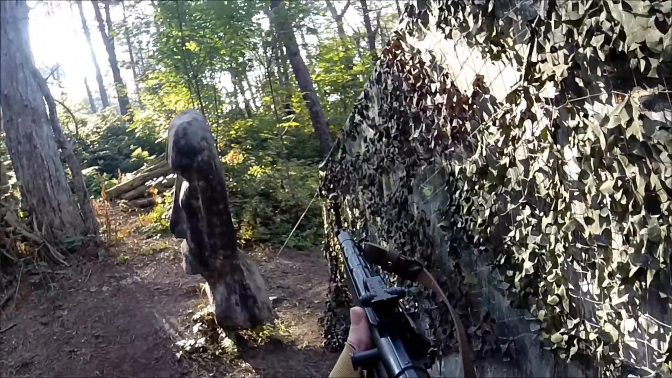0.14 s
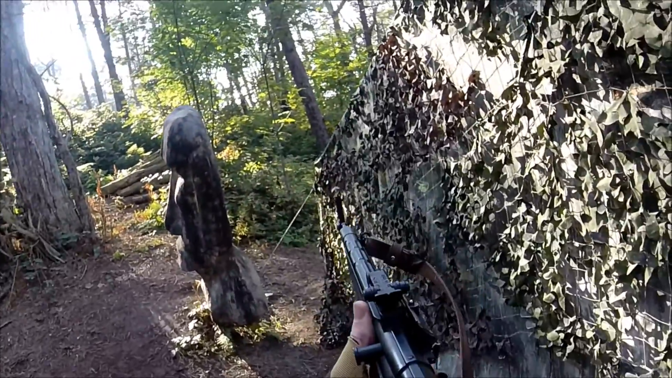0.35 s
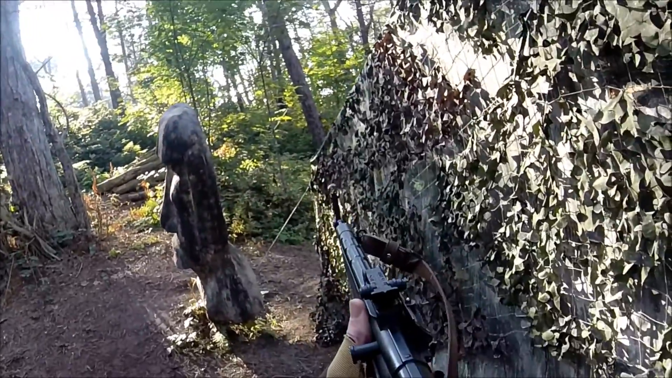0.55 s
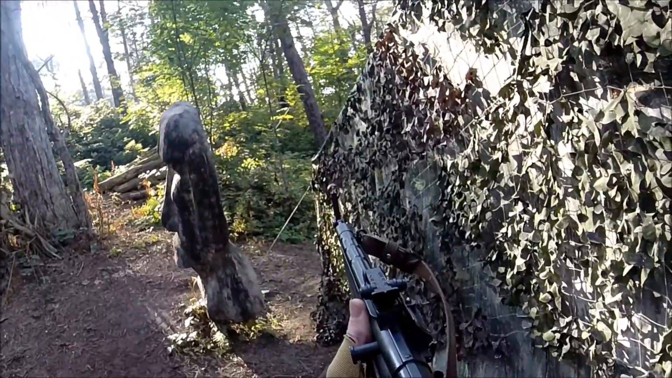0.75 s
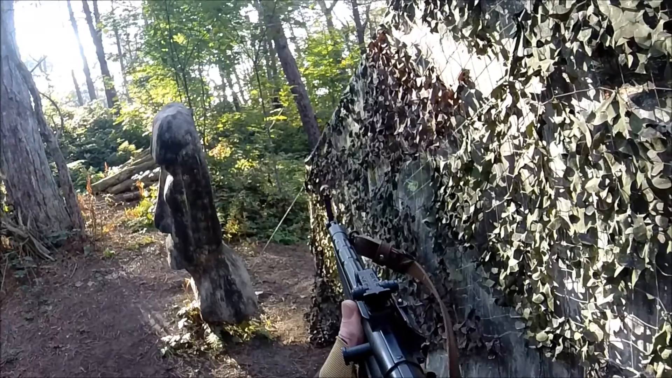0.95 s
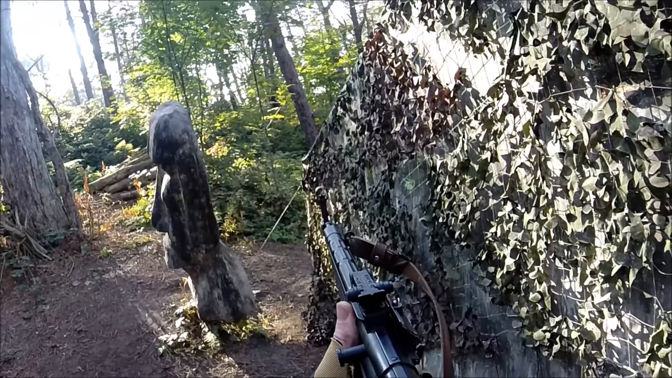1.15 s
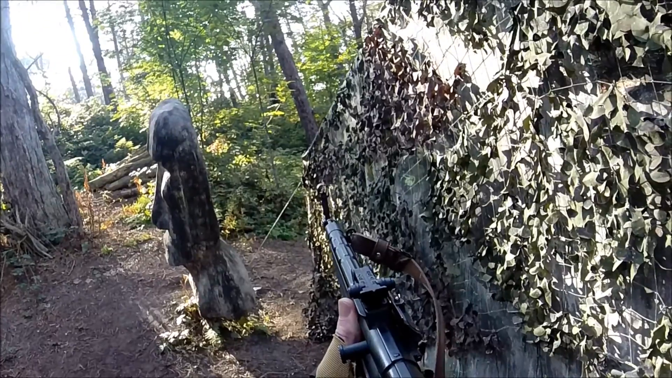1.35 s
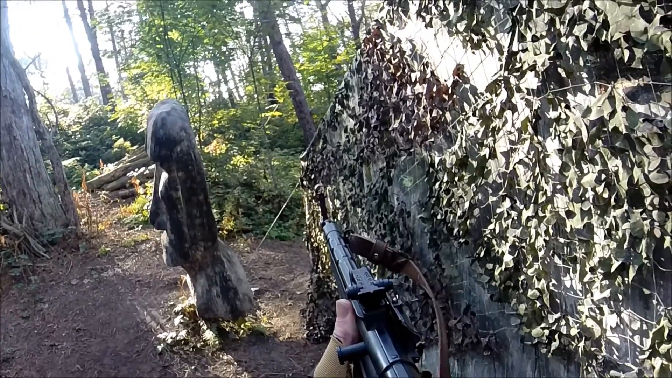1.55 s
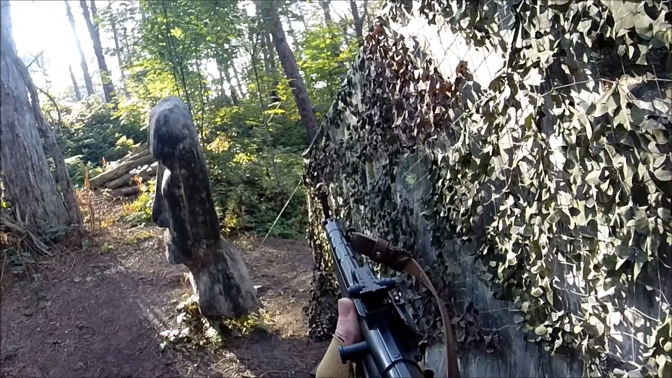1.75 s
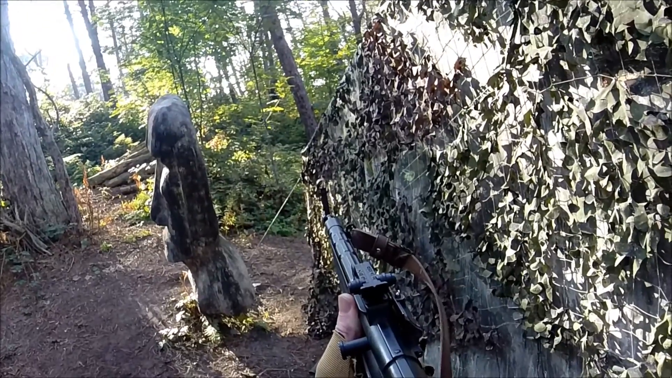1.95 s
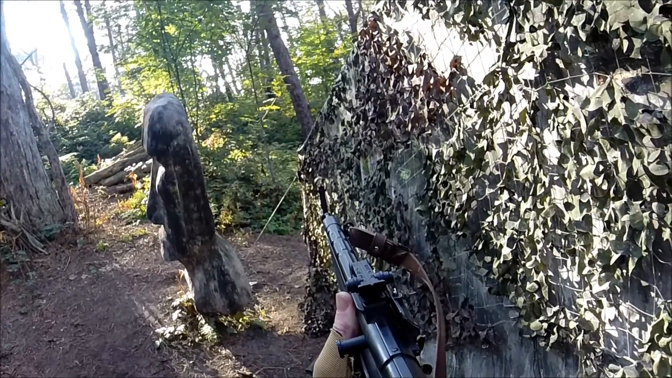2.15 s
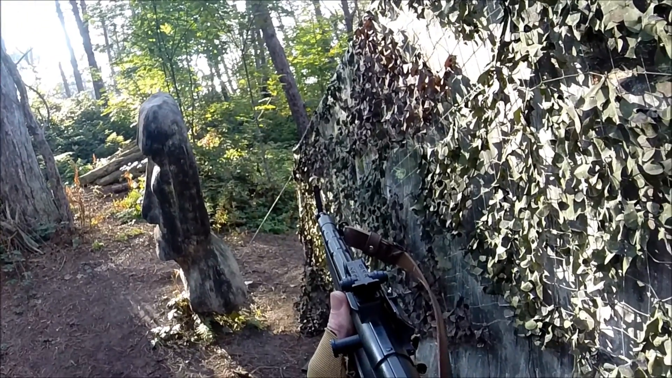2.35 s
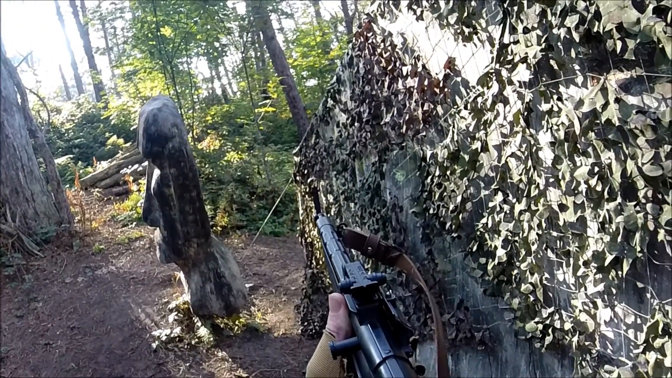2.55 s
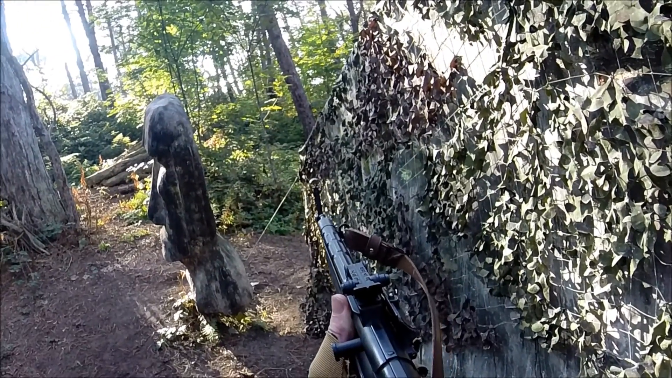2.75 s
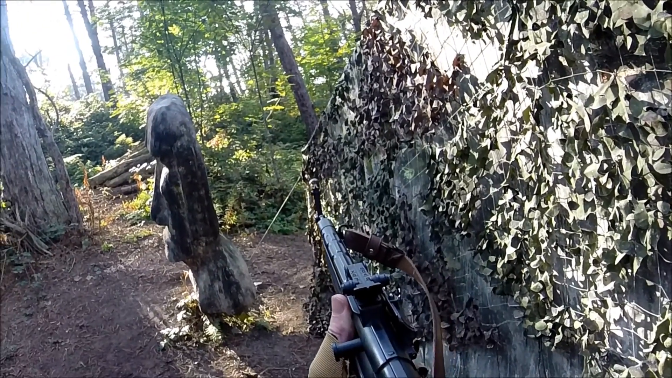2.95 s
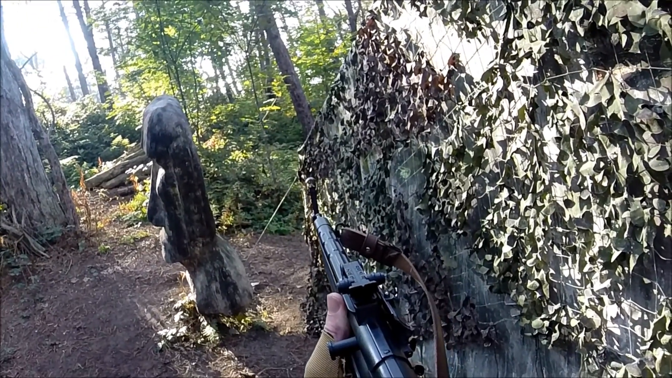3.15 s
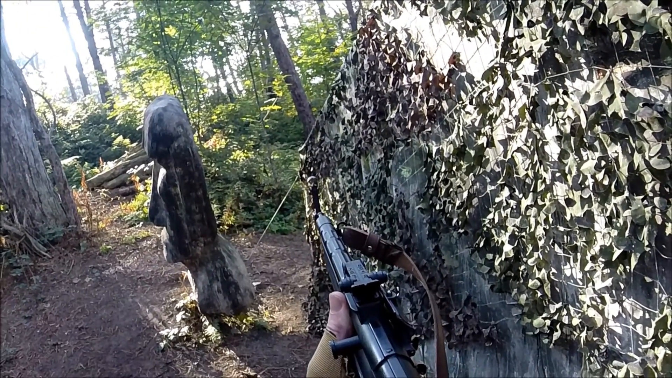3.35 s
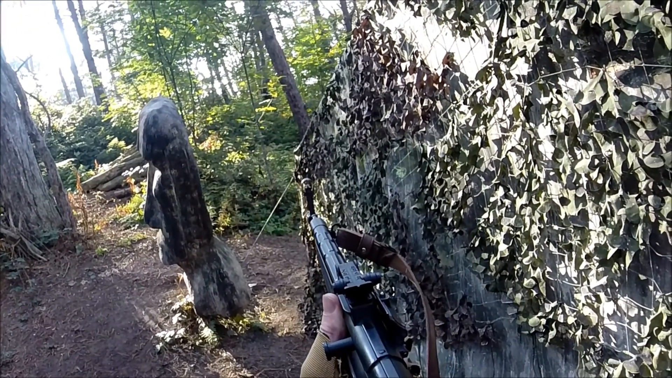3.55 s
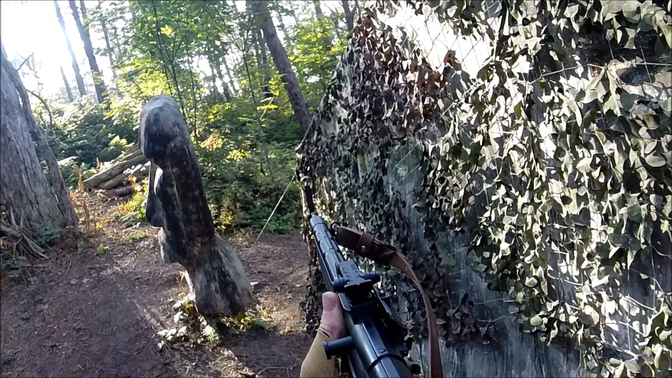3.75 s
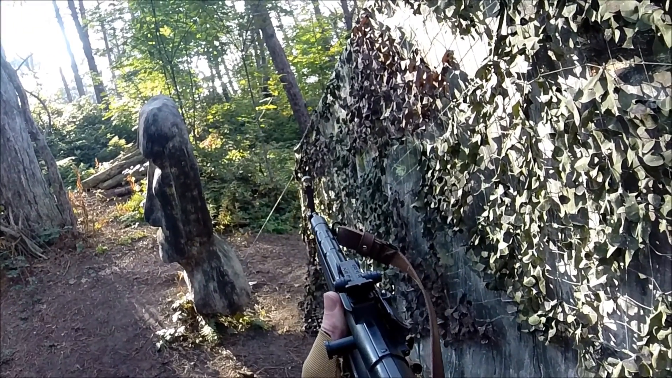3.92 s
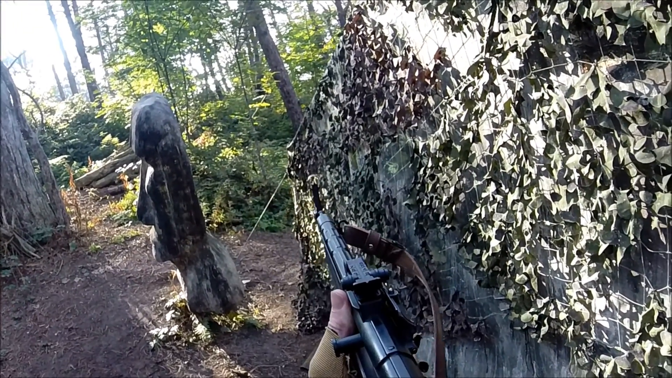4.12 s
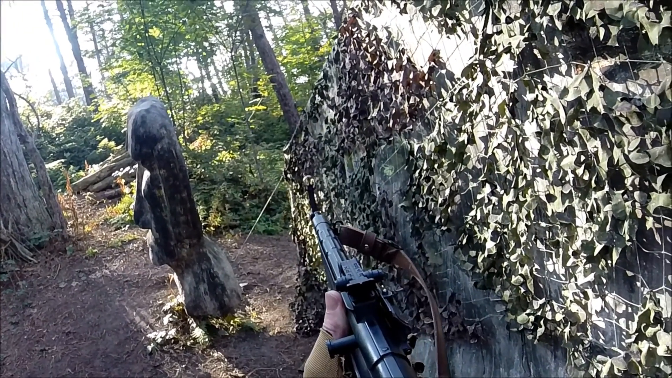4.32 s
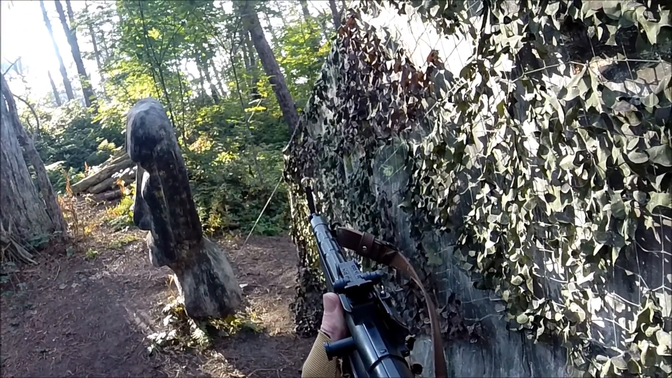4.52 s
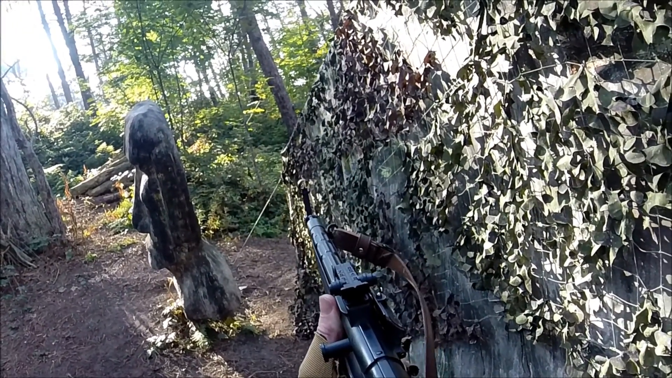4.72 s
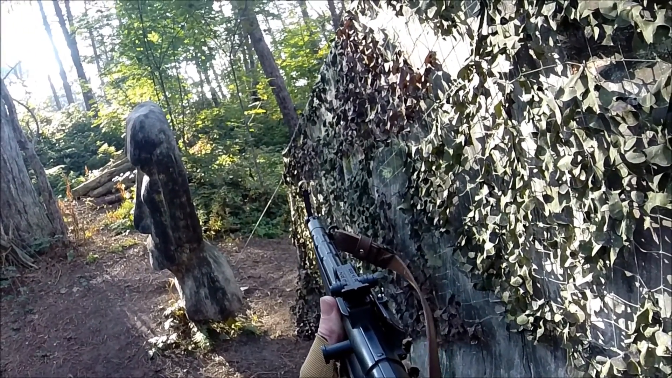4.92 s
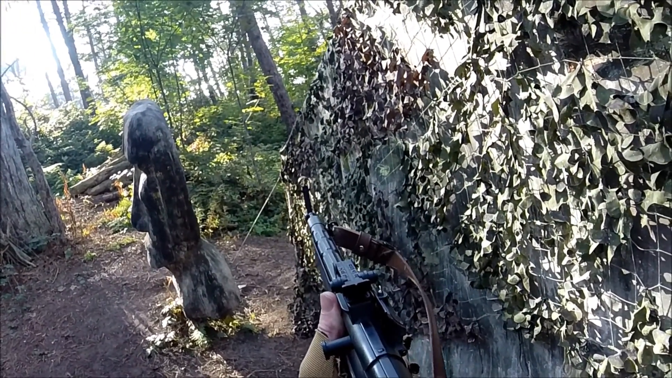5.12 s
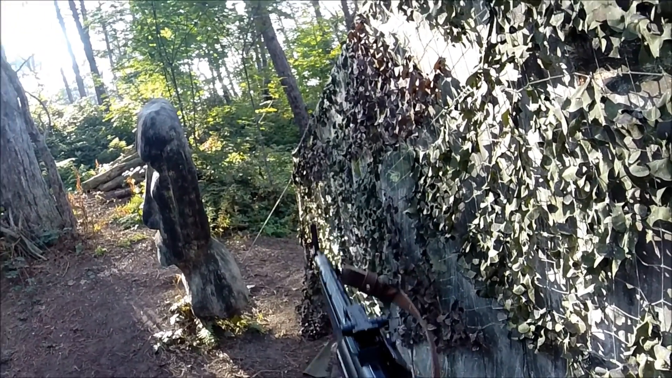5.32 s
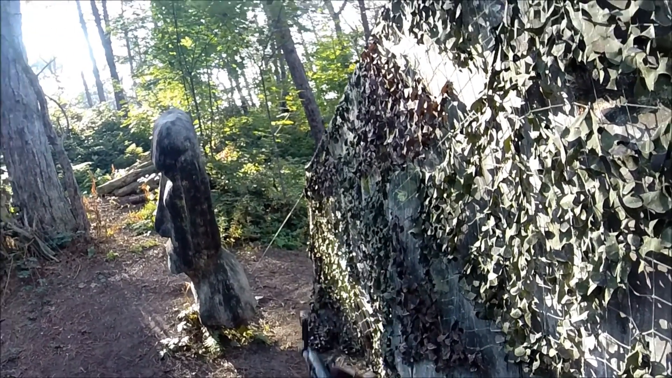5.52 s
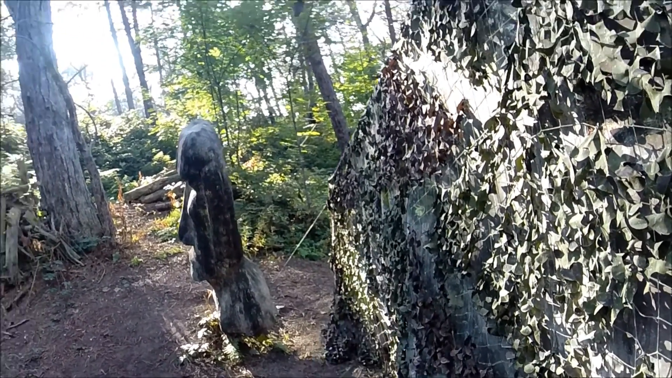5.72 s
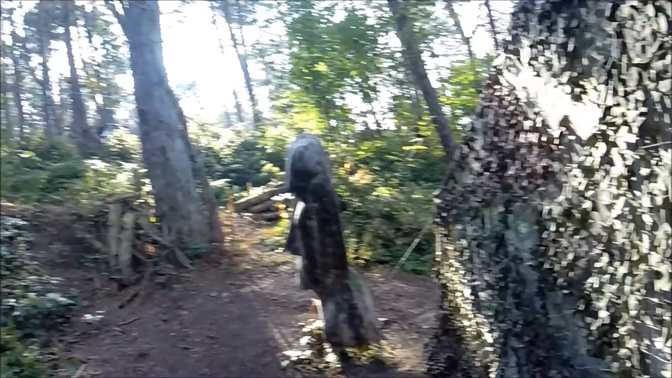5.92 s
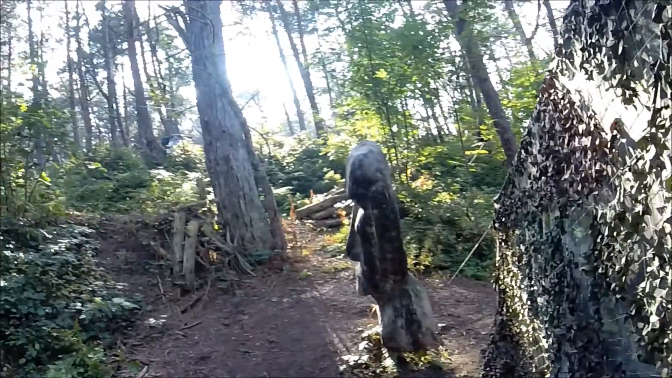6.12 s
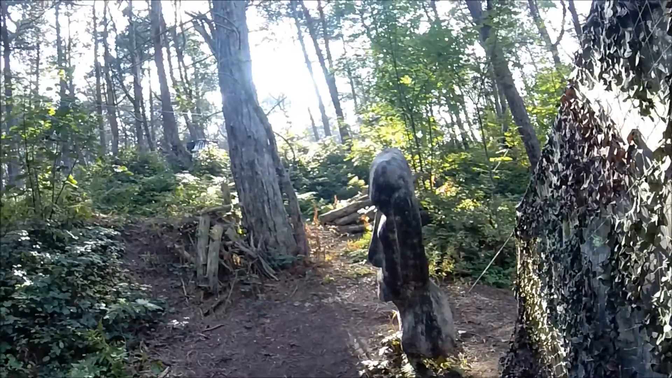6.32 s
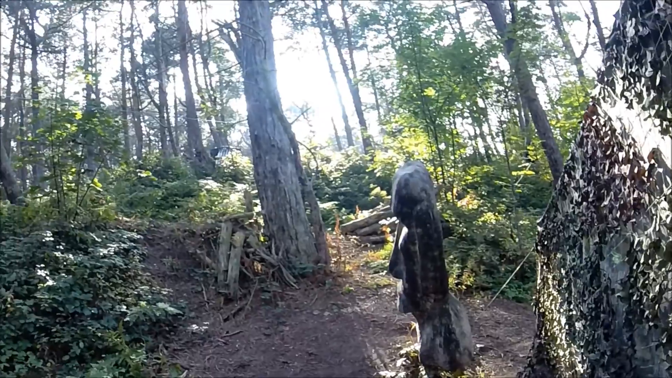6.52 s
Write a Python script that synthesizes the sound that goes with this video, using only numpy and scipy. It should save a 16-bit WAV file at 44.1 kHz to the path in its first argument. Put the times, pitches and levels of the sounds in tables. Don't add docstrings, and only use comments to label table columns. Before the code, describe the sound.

Quiet woodland air with soft leaf rustle and faint low wind puffs. At about 0.17 s a trigger clicks, a small electric motor whines up, and from 0.27 to 2.67 s a replica rifle fires 24 hard, dry cracks at nearly ten a second. Each has a brief release clack, a woody, metallic piston slam, a tiny airy pop and a light plate snap, with gears whirring and labouring between. The tone starts slightly higher and settles. Gears run down and latch with a clear click at 2.78 s. A second trigger click at 3.08 s brings nine shots until 4.0 s; a third at 4.3 s brings nine more until 5.28 s, the second-last weaker. The motor stops. From 5.5 s come sparse handling ticks, growing into light knocks and bright rattles against sling and netting until 6.65 s. Everything is close and mostly dry, with very faint tree echoes and a boxy, softened treble.

```python
import sys
import numpy as np
from scipy import signal
from scipy.fft import rfft, irfft
from scipy.io import wavfile

SR = 44100
rng = np.random.default_rng(int(sys.argv[2]) if len(sys.argv) > 2 else 0)


def gain_from_decibels(decibels):
    exponent = np.asarray(decibels, float) / 20
    return 10 ** exponent


def generate_wav(sig):
    pcm = np.round(np.clip(np.atleast_2d(sig).T, -1, 1) * 32767).astype(np.int16)
    wavfile.write(sys.argv[1], SR, pcm)


N = 294069

# (time [s], leaves level [dB])
STIR = [(0, -47), (.16, -48.5), (2.85, -52.5), (3.05, -55.5), (4.28, -53.5), (5.4, -60.5), (5.8, -54),
        (6.1, -52.5), (6.3, -45.5), (6.45, -49.5), (6.67, -49)]
# (time [s], level [dB], length [s])
GUSTS = [(0.115, -50, 0.035), (3.0, -58.5, .12), (4.21, -62, 0.13), (5.76, -71, 0.043), (6.066, -59, 0.037),
         (6.212, -54, 0.029), (6.368, -58, 0.036), (6.56, -55, 0.1)]
# (frequency [Hz], density [dB per Hz])
LEAF_SPECTRUM = [(100, -2.5), (250, -2), (350, 1), (500, -2.5), (1100, -2), (1700, -12.5), (3300, -9),
                 (6500, -15.5), (10000, -40), (15000, -42.5)]
# (frequency [Hz], width [Hz], level [dB])
RUSTLE = [(850, 310, -2), (2050, 910, 4.5), (3050, 670, 5), (4570, 490, -4), (6750, 2300, -4.5),
          (10500, 2000, -12.5)]
NETTING_DB, CALM_WIND_DB = -11.5, -11.5
# (delay [s], level [dB])
ECHOES = [(0.012, -21), (.031, -25.5), (.058, -37.5), (0.099, -42)]
# (frequency [Hz], width [Hz], level [dB])
HOUSING_DIPS = [(1813, 530, 0), (2573, 860, -7), (4900, 640, -8), (9380, 310, -16), (11560, 390, 2)]

# (time [s], knock level [dB], rattle level [dB], rattle frequency [Hz], decay t60 [s])
LATCHES = [
    (0.167, -11, -40, 2100, 0.022),
    (2.78, -10, -22, 2850, 0.035),
    (2.8, -24, -28, 3270, 0.011),
    (2.813, -32, -40, 3400, 0.031),
    (3.033, -47, -47, 2926, 0.036),
    (3.083, -17, -31, 2106, .047),
    (4.098, -21, -52, 2030, .015),
    (4.296, -18, -42, 2098, 0.023),
]
# (time [s], knock level [dB], rattle level [dB], rattle frequency [Hz], decay t60 [s])
HANDLING = [(5.476, -46, -51.5, 3500, .05), (5.733, -39, -29.5, 3520, 0.032), (5.89, -25, -37, 5800, 0.061),
            (5.916, -33, -44, 2070, .03), (5.993, -48, -49, 3150, .031), (6.01, -32, -53, 1930, .026),
            (6.081, -47, -45, 4620, 0.075), (6.147, -26, -33, 3150, 0.028), (6.153, -24, -32, 1940, 0.064),
            (6.184, -26, -36, 1860, 0.054), (6.199, -28, -37, 1990, 0.055), (6.285, -46, -42, 6400, 0.031),
            (6.361, -26.5, -28.5, 5840, 0.085), (6.384, -35, -38, 1800, 0.032),
            (6.404, -28.5, -28, 1800, .04), (6.522, -21.5, -25, 3870, 0.12), (6.564, -30, -31, 1900, 0.08),
            (6.574, -36, -30.5, 5000, 0.2), (6.61, -23.5, -30.5, 1830, 0.038)]
CONTACT_RISE_S = 0.00068

# (time of slam [s], slam level [dB], release level [dB])
LONG_BURST = [(0.2665, -3, -14.5), (0.371, -5, -17), (0.4729, -5, -14), (0.5743, -5, -13),
              (0.676, -5, -11.5), (0.7783, -5, -15.5), (0.8814, -4.5, -11), (0.9857, -5, -10.5),
              (1.089, -7, -16.5), (1.192, -7, -14), (1.2973, -6.5, -12), (1.4015, -5.5, -13),
              (1.506, -6, -11.5), (1.6106, -6, -13.5), (1.715, -5, -11), (1.8204, -4.5, -11),
              (1.9253, -3.5, -10.5), (2.03, -9.5, -10), (2.1351, -10, -16.5), (2.241, -9, -12),
              (2.3473, -6.5, -10.5), (2.4529, -7, -13), (2.5591, -6.5, -12.5), (2.665, -5, -8.5)]
# (time of slam [s], slam level [dB], release level [dB])
SECOND_BURST = [(3.1489, -5, -9.5), (3.262, -6.5, -8), (3.369, -7, -12), (3.4756, -7.5, -11),
                (3.582, -7, -16), (3.6888, -7.5, -14.5), (3.7951, -6, -12), (3.9024, -6, -13),
                (4.0091, -7, -13)]
# (time of slam [s], slam level [dB], release level [dB])
THIRD_BURST = [(4.4143, -5.5, -5), (4.5245, -6.5, -10), (4.6315, -6, -10.5), (4.7386, -6, -10),
               (4.8467, -6, -10), (4.951, -6.5, -11), (5.0602, -8, -18), (5.1715, -15.5, -25),
               (5.2825, -7, -18)]
# (time [s], shoulder pressure [dB], handguard ring [dB])
GRIP = [(.26, -0.5, -30), (.9, 0.5, -29), (1.09, -3.5, -46), (1.4, 0, -36), (1.92, 1.5, -17),
        (2.04, -4, -3.5), (2.4, 0.5, -7.5), (3.2, 0.1, -4), (4.5, .5, -3), (4.85, -0.5, -6),
        (4.95, -7, -1.5), (5.3, -7.5, -1.5)]
WINDING_DB, SHOVE_DB, MUZZLE_DB = -25, -18.5, -19
MUZZLE_PRESSURE_SHARE, MUZZLE_RING_SHARE, MUZZLE_CHANCE_DB = 0.68, 0.042, 0.26
PLATE_DB, PLATE_SAG_DB_PER_S, PLATE_CHANCE_DB, PLATE_END_DB = -21, 0.9, 3, -10

# (time [s], time of top speed [s], top tooth rate [Hz], gears level [dB], whine re gears [dB])
PULLS = [
    (.163, 0.23, 595, -19.5, 4.5),
    (3.082, 3.12, 385.6, -23, 3),
    (4.295, 4.376, 630, -22, 2),
]
# (time after a slam [s], load level [dB], tooth rate [Hz], whine level [dB])
WINDING = [
    (.0, 4.5, 519.4, -14),
    (.021, -4, 689.9, -17),
    (.036, 3, 702.2, -16.5),
    (.046, 1.5, 670, -15),
    (.06, -2, 605, -9),
    (.075, 0.5, 534.9, -12.5),
    (.097, -0.5, 444.6, -2.5),
]
# (time of power off [s], gears level [dB], level before latch [dB], time of latch [s], latch level [dB])
RUN_OUT = [
    (2.746, -27, -48.5, 2.782, -17.5),
    (4.038, -39, -34.5, 4.099, -30),
    (5.306, -33, -41, 5.325, -40.5),
]
# (frequency [Hz], width [Hz], level [dB])
GEARBOX = [(612, 333, -3.5), (800, 230, 2.5), (905, 97, 5.5), (1218, 177, -3), (1530, 143, -8),
           (2145, 167, -5), (3150, 540, -8.5), (4770, 1000, -12.5), (6550, 1020, -14.5), (11100, 260, -46),
           (12100, 900, -46)]
# (multiple of the tooth rate [1], level [dB])
MESHING = [(.87, -8.5), (1.52, -5), (2, 0), (2.15, -10), (3, -8.5), (3.9, -14)]
CATCH_S, START_HZ, CATCH_HZ, LOADED_HZ, START_DB = .02, 308.6, 399.6, 420.8, -10.5
NEARLY_S, NEARLY_SHARE = .052, .94
SING_S, SING_HZ, SING_DB = .034, 485.6, 8.5
COAST_HZ, COAST_WHINE_DB, LATCH_RISE_S, STOP_S, STOP_DB = 481.2, -13, 0.013, .05, -56

FREE, AGAIN, OUT, BACK = -.0114, -.009, -.0078, -.0041
HIT, POP, BOUNCE, SNAP = -.0006, .0012, .0041, .0272
# (frequency [Hz], width [Hz], level [dB])
AIR = [(1970, 1700, -4.5), (2670, 360, 6.5), (4300, 700, -7.5), (6400, 490, 2), (7700, 4500, -23),
       (9700, 350, -19.5), (12800, 1900, -20)]
# (frequency [Hz], width [Hz], level [dB])
MUZZLE = [(2300, 1760, 1), (3464, 320, 5.5), (4340, 270, 5.5), (5860, 1810, 0), (7762, 2600, -4.5),
          (11160, 600, -14.5), (11900, 1100, -27.5)]
# (time after slam
# [s], frequency [Hz], level [dB], decay t60 [s])
SLAM = [(HIT, 840, 3.46, 0.005), (HIT, 750, -14, 0.023), (HIT, 570, -4, 0.017), (HIT, 371, -11.5, 0.023),
        (HIT, 272, -18.5, 0.038), (HIT, 1494, -17.5, 0.011), (POP, 2167, -20.5, 0.013),
        (POP, 3620, -17, 0.0098), (POP, 3200, -28, .02), (POP, 7960, -6, 0.0012),
        (POP, 9500, -25.5, 0.0046)]
# (time after slam [s], frequency
# [Hz], level [dB], decay t60 [s])
REBOUND = [(HIT, 1270, -6, 0.0091), (BOUNCE, 760, -7, 0.032), (BOUNCE, 130, -22, 0.009),
           (BOUNCE, 411, -12.5, 0.013), (BOUNCE, 3350, -54, .012)]
# (time after slam [s], frequency [Hz], level [dB], decay t60 [s])
RELEASE = [(FREE, 990, -2.7, 0.0071), (FREE, 370, -3, .016), (FREE, 2020, -5.5, 0.0084),
           (AGAIN, 990, 0, 0.013), (FREE, 2670, 0, 0.0076), (OUT, 160, -19.5, 0.029)]
# (time after slam [s], frequency [Hz], level [dB], decay t60 [s])
PLATE = [(SNAP, 950, 5, .03), (SNAP, 2100, -1, .014), (SNAP, 3350, -4, .01), (SNAP, 560, -8, .02),
         (SNAP, 310, -8, .02)]
SETTLED_PITCH, FRESH_RISE, SETTLE_S = 1.0793, 0.11, 0.71
LOOSE_RING_DB, LOOSE_GAIN, REBOUND_FOLLOWS = -27.5, 1.84, 0.22


def rms_one(x):
    return x / np.sqrt(np.mean(x ** 2) + 1e-20)


def in_time(rows):
    s, *columns = np.transpose(rows)
    t = np.arange(N) / SR
    return [np.interp(t, s, column) for column in columns]


def butter(x, order, hz, kind="low"):
    return signal.sosfilt(signal.butter(order, hz, kind, fs=SR, output="sos"), x)


def clicks(seconds, db):
    out = np.full(N, 1e-18)
    out[np.round(np.asarray(seconds) * SR).astype(int)] = gain_from_decibels(db)
    return out


def fade(x, t60, rise):
    decay = gain_from_decibels(-60 / (t60 * SR))
    lag = np.exp(-1 / (rise * SR))
    return signal.lfilter([1 - lag], [1, -lag], signal.lfilter([1], [1, -decay], x))


def resonance(x, hz, width):
    r = np.exp(-np.pi * width / SR)
    numerator = np.array([1, 0, -1]) * (1 - r * r) / 2
    return signal.lfilter(numerator, [1, -2 * r * np.cos(2 * np.pi * hz / SR), r * r], x)


def shell(x, peaks):
    return sum((-1) ** k * gain_from_decibels(db) * resonance(x, hz, width) for k, (hz, width, db) in enumerate(peaks))


def drift(hz, size=N):
    noise = rng.standard_normal(size + SR)
    return rms_one(butter(noise, 2, hz)[SR:])


def wood():
    leaves_db, = in_time(STIR)
    t = np.arange(N) / SR
    wind = gain_from_decibels(leaves_db + CALM_WIND_DB)
    for s, db, length in GUSTS:
        wind = wind + gain_from_decibels(db) * np.exp(-((t - s) / length) ** 2)
    rumble = rms_one(butter(rng.standard_normal(N), 2, [35, 110], "band"))

    hz = np.fft.rfftfreq(N, 1 / SR) + 1
    points, db = np.transpose(LEAF_SPECTRUM)
    spectrum = gain_from_decibels(np.interp(np.log(hz), np.log(points), db))
    leaves = rms_one(irfft(rfft(rng.standard_normal(N)) * spectrum, N))

    grains = rng.standard_normal(N) * gain_from_decibels(3.0 * drift(60) + 2.0 * drift(11))
    netting = rms_one(shell(grains, RUSTLE))
    return (wind * gain_from_decibels(2.4 * drift(18)) * rumble + gain_from_decibels(leaves_db + 2.35 * drift(14)) * leaves
            + gain_from_decibels(leaves_db + NETTING_DB) * netting)


def trees(x):
    tail = np.zeros(int(.2 * SR))
    for s, db in ECHOES:
        smear = rng.standard_normal(900) * np.exp(-np.arange(900) / 250)
        at = round(s * SR)
        tail[at:at + 900] += gain_from_decibels(db - 21.5) * smear
    return signal.lfilter([.4], [1, -.6], signal.fftconvolve(x, tail)[:N])


def knocks():
    size = 6000
    out, t = np.zeros(N + size), np.arange(size) / SR
    for s, knock_db, rattle_db, rattle_hz, t60 in LATCHES + HANDLING:
        noise = rng.standard_normal(size)
        noise[40] += 9.0
        scuff = noise * gain_from_decibels(-60 * t / max(t60, .005)) * (1 - np.exp(-t / CONTACT_RISE_S))
        knock = resonance(resonance(scuff, 860, 510), 1160, 1200)
        rattle = shell(scuff, RUSTLE[1:]) + 2.85 * resonance(scuff, rattle_hz, 360)
        at = round(s * SR)
        out[at:at + size] += gain_from_decibels(knock_db) * knock / abs(knock).max()
        out[at:at + size] += gain_from_decibels(rattle_db + 5.5) * rattle / abs(rattle).max()
    return out[:N]


def cycles():
    bursts = (LONG_BURST, SECOND_BURST, THIRD_BURST)
    s, slam_db, release_db = np.concatenate(bursts).T
    held, *grip = np.transpose(GRIP)
    firm_db, ring_db = (np.interp(s, held, column) for column in grip)
    chance = rng.standard_normal((2, len(s)))
    ends = np.isin(s, [burst[end][0] for burst in bursts for end in (0, -1)])
    muzzle_db = MUZZLE_DB + MUZZLE_PRESSURE_SHARE * firm_db + MUZZLE_RING_SHARE * ring_db
    muzzle_db = muzzle_db + MUZZLE_CHANCE_DB * chance[0]
    plate_db = PLATE_DB - PLATE_SAG_DB_PER_S * s + firm_db + PLATE_CHANCE_DB * chance[1] + PLATE_END_DB * ends
    return np.transpose([s, slam_db, release_db, muzzle_db, plate_db, firm_db, ring_db])


def motor(shots):
    rows = []
    for (pull, top, hz, db, tone_db), burst in zip(PULLS, (LONG_BURST, SECOND_BURST, THIRD_BURST)):
        sing_db = SING_DB - (hz < SING_HZ) * 6
        rows += [(pull - .002, -90, START_HZ, -20),
                 (pull, db + START_DB, START_HZ, -20),
                 (pull + CATCH_S, db - 5.5, CATCH_HZ, -7),
                 (pull + SING_S, db, min(hz, SING_HZ), sing_db),
                 (top, db, hz, tone_db),
                 (pull + NEARLY_S, db, NEARLY_SHARE * hz, tone_db - 4.0),
                 (burst[0][0] + FREE, db + .6, LOADED_HZ, tone_db - 21)]
    for off, db, low_db, latch, latch_db in RUN_OUT:
        stop = latch + STOP_S
        levels = [(off, db), (latch - LATCH_RISE_S, low_db), (latch, latch_db), (stop, STOP_DB), (stop + .004, -90)]
        rows += [(s, level_db, COAST_HZ, COAST_WHINE_DB) for s, level_db in levels]
    for shot, following in zip(shots, list(shots[1:, 0]) + [np.inf]):
        period, base_db = following - shot[0], WINDING_DB + shot[5]
        if period < .15:
            rows += [(shot[0] + s * period / .106, base_db + db, hz, tone_db) for s, db, hz, tone_db in WINDING]
        else:
            rows += [(shot[0] + .017, base_db + 2.0, COAST_HZ, COAST_WHINE_DB)]
    return in_time(sorted(rows))


def gears(shots):
    level_db, rate, whine_db = motor(shots)
    turns = np.cumsum(rate * (1 + .014 * drift(70))) / SR
    teeth = np.diff(np.floor(turns), prepend=0) * gain_from_decibels(7.5 * rng.standard_normal(N))
    grind = rng.standard_normal(N) * gain_from_decibels(2.43 * drift(74))
    rasp = rms_one(shell(rms_one(teeth) + 4.7 * grind, GEARBOX))

    whine = np.zeros(N)
    for multiple, db in MESHING:
        tone_db = db + (whine_db if multiple == 2 else -abs(whine_db + 9))
        whine += gain_from_decibels(tone_db + 3.5 * drift(90)) * np.sin(2 * np.pi * multiple * turns)
    whine = butter(whine, 2, [500, 2700], "band")
    whine = whine - 0.82 * resonance(whine, 1860, 490)
    return butter(gain_from_decibels(level_db - 3.0) * (rasp + 1.31 * whine), 4, 440, "high")


def piston(shots):
    s, _, release_db, muzzle_db, plate_db, *_ = shots.T
    noise = rng.standard_normal((3, N))
    rattle = fade(clicks(s + FREE, release_db - 7.5) + clicks(s + OUT, release_db - 15.0), t60=0.03, rise=0.00027)
    pop = fade(clicks(s + POP, muzzle_db + 2.5), t60=.004, rise=.0001)
    jet = fade(clicks(s, muzzle_db + 7.0) + clicks(s + BOUNCE, muzzle_db - 23.5), t60=0.042, rise=0.00067)
    buzz = fade(clicks(s + SNAP, plate_db - 5.5), t60=0.033, rise=0.0012)
    pop_peaks = [(hz, 2 * width, 1.55 * db) for hz, width, db in MUZZLE]
    air = rattle * rms_one(shell(noise[0], AIR))
    air = air + pop * rms_one(shell(noise[1], pop_peaks))
    air = air + (jet + buzz) * rms_one(shell(noise[2], MUZZLE))
    return butter(air, 2, 9500)


def struck(modes, t, pitch, spread_db):
    out = np.zeros_like(t)
    for s, hz, db, t60 in modes:
        since = np.maximum(t - s, 0)
        contact = 1 - np.exp(-since * hz * 2)
        envelope = gain_from_decibels(db + spread_db * rng.standard_normal() - 60 * since / t60) * contact
        out += envelope * np.sin(2 * np.pi * hz * pitch * since)
    return out


def blows(shots):
    out, lead = np.zeros(N), 700
    t = (np.arange(4000) - lead) / SR
    shove = np.sin(2 * np.pi * 100 * (t - BACK)) * np.exp(-((t - BACK) / 0.0063) ** 2)
    for s, slam_db, release_db, _, plate_db, firm_db, ring_db in shots:
        pitch = SETTLED_PITCH + FRESH_RISE * np.exp((shots[0, 0] - s) / SETTLE_S)
        handguard = (HIT / 2, 1150, ring_db, .018)
        barrel = (POP, 2200, LOOSE_RING_DB - LOOSE_GAIN * firm_db, .025)
        rebound = gain_from_decibels(REBOUND_FOLLOWS * firm_db) * struck(REBOUND, t, pitch, 1.0)
        inward = struck(SLAM + [handguard, barrel], t, 0.96, 1.0)
        shot = gain_from_decibels(slam_db + 6) * (rebound - inward)
        shot += gain_from_decibels(release_db) * struck(RELEASE, t, pitch, 0.8)
        shot += gain_from_decibels(SHOVE_DB + firm_db) * shove
        shot += gain_from_decibels(plate_db) * struck(PLATE, t, 0.99, 2.56)
        at = round(s * SR) - lead
        out[at:at + len(t)] += shot
    return out


def scene():
    background = wood()
    shots = cycles()
    gun = butter(knocks() + gears(shots) + piston(shots) + blows(shots), 2, 60, "high")
    return (gun + trees(gun) + background)[None]


def roll_off(x):
    return signal.sosfilt(signal.butter(12, 15960, fs=SR, output="sos"), x)


def record(dry):
    x = dry
    for hz, width, db in HOUSING_DIPS:
        x = x - (1 - gain_from_decibels(db)) * resonance(x, hz, width)
    x = butter(1.25 * np.tanh(x / 1.25), 4, 13500)
    x = .97 * np.tanh((np.abs(x) / .97) ** 4) ** .25 * np.sign(x)
    return roll_off(x)


dry = scene()
out = record(dry)
generate_wav(out)
```